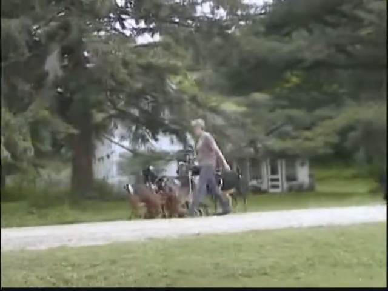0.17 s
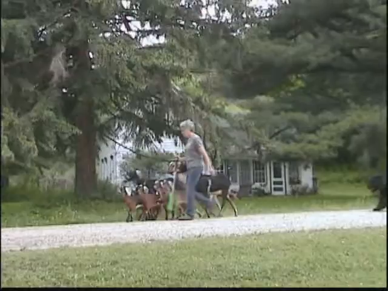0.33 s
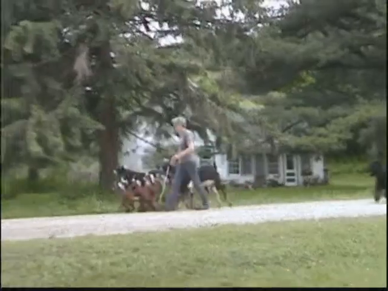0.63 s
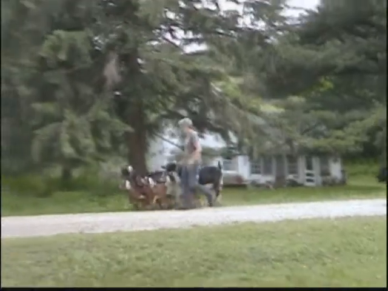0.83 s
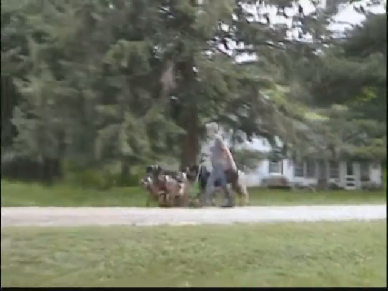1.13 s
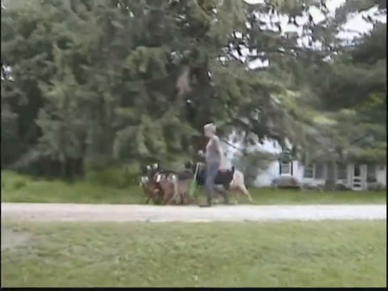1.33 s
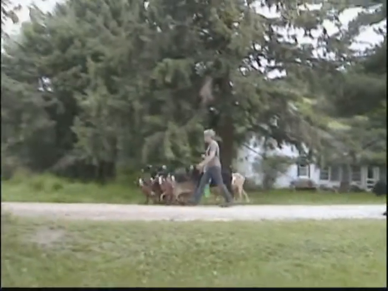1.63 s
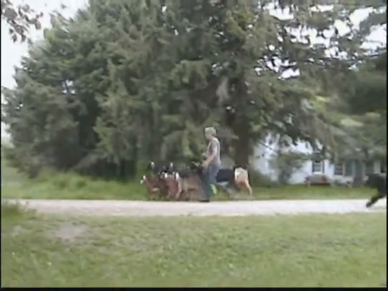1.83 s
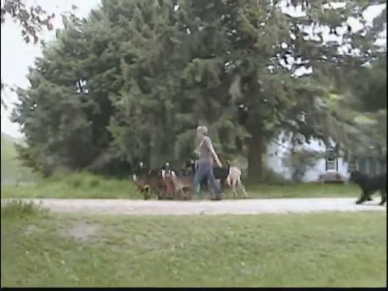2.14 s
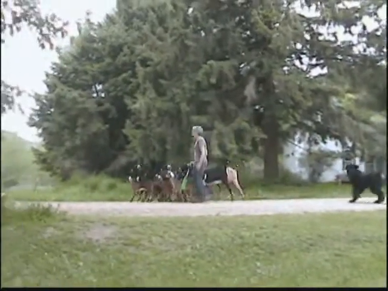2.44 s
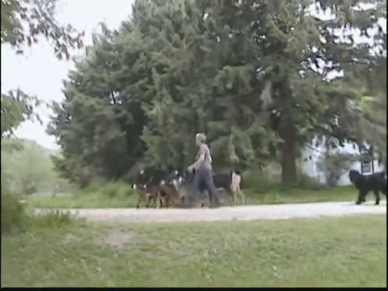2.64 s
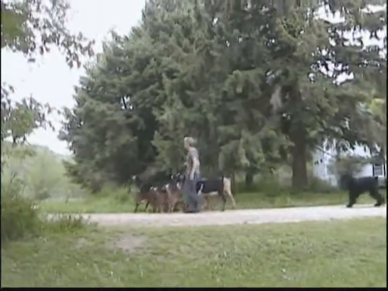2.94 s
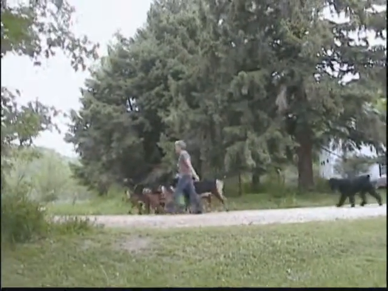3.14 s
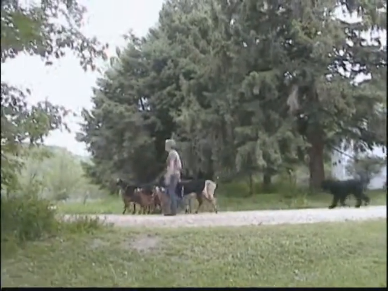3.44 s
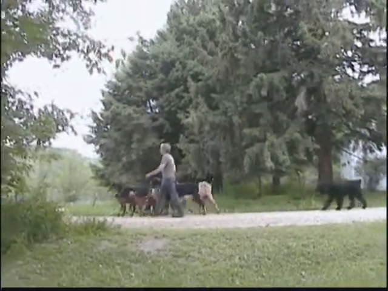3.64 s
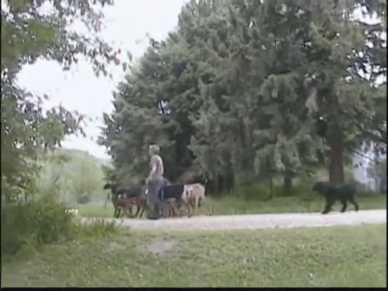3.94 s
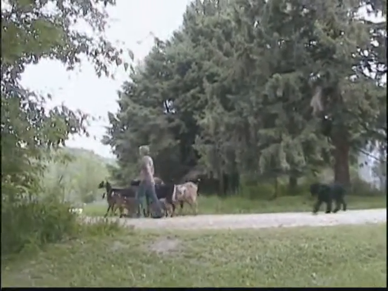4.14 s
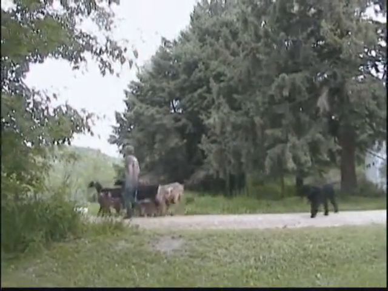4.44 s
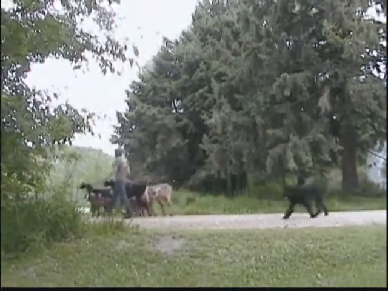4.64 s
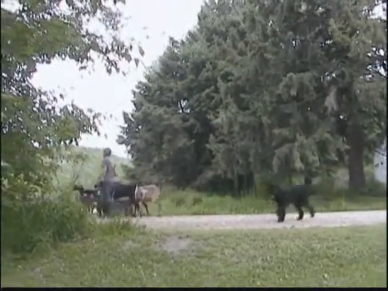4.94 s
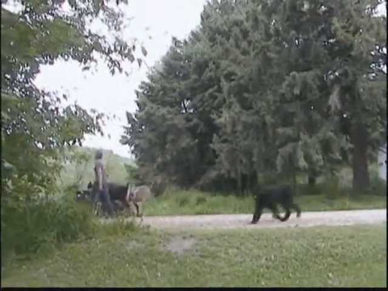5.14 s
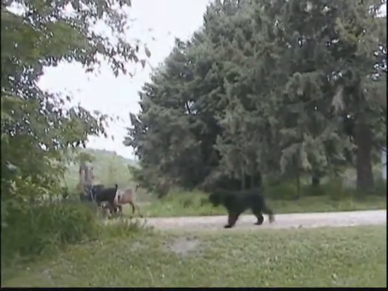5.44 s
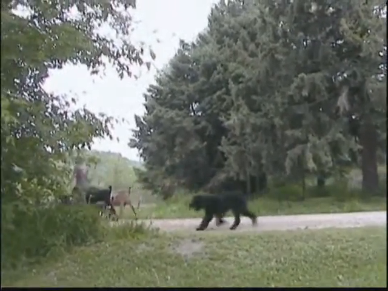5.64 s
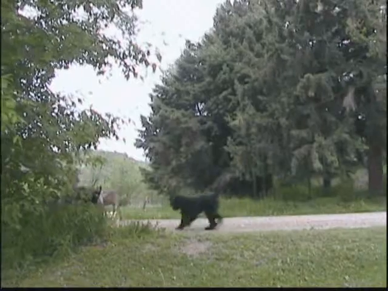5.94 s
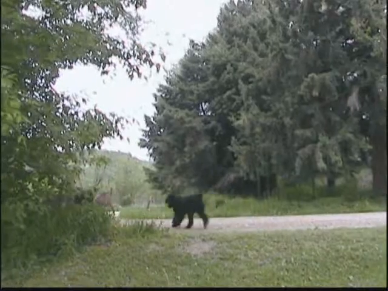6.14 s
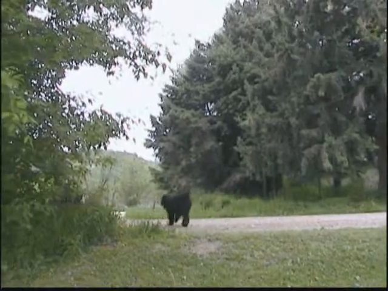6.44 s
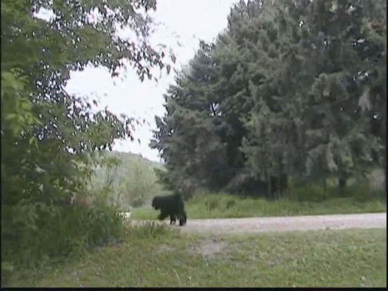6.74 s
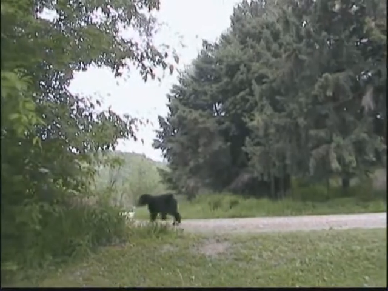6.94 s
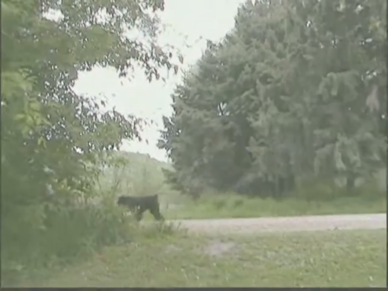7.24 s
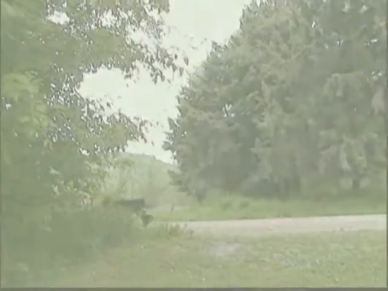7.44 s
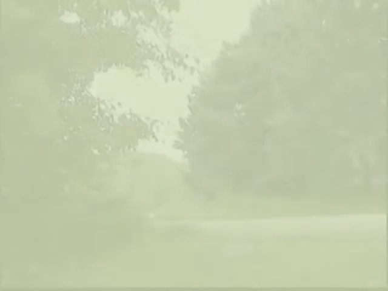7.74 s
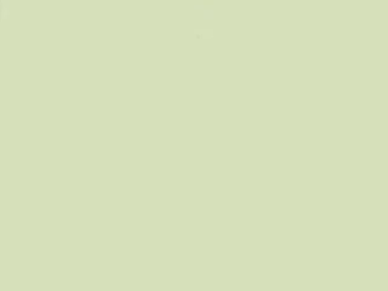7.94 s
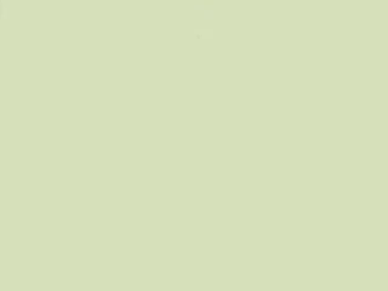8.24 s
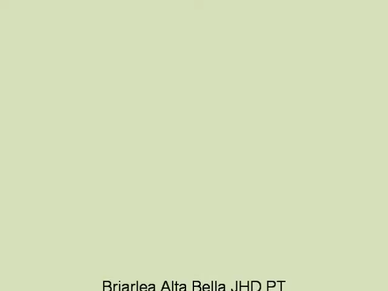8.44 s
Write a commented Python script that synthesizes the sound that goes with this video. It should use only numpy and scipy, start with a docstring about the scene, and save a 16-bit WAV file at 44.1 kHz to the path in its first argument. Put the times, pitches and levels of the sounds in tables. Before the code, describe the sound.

Outdoors, a herd of goats walks off with collar bells ticking and ringing at each step, hooves barely crunching on gravel. Scattered woody knocks and crisp grass rustles come from near the microphone. In the second half a small bird chirps softly in the trees while the jingling gradually weakens. A last sharp knock sounds just before the bells and quiet background hiss fade quickly.

```python
"""Jingle bells shake on the collars of a small herd of goats walking a gravel drive, some way off.
Each step throws the pellets against the slit shells, which tick and ring; hooves crunch faintly.
Close by someone scuffs through grass, a few dry knocks sound, and a songbird whistles in the trees.
Underneath lie a low outdoor murmur, soft hiss and the faint whine of a camera motor; all fades at the end."""
import sys
import numpy as np
from scipy import signal
from scipy.fft import rfft, irfft, next_fast_len
from scipy.io import wavfile
from scipy.ndimage import uniform_filter1d

SR = 44100
rng = np.random.default_rng(int(sys.argv[2]) if len(sys.argv) > 2 else 0)


def dump_mix(stems):
    """Bounce the given channels to the path in sys.argv[1] as a 16-bit WAV at rate SR."""
    frames = np.atleast_2d(stems).T  # one column per channel
    limited = np.clip(frames, -1, 1)  # hard clip at full scale
    pcm = np.round(limited * 32767).astype(np.int16)
    wavfile.write(sys.argv[1], SR, pcm)


N = 378800
TIME = np.arange(N) / SR
PADDED = next_fast_len(N, real=True)
FREQ = np.fft.rfftfreq(PADDED, 1 / SR)


def gain_of(db):
    """Decibels to amplitude."""
    return 10 ** (np.asarray(db) / 20)


def unit_rms(x):
    """Scales to an rms of one."""
    return x / np.sqrt(np.mean(x ** 2) + 1e-20)


def automation(rows):
    """Breakpoints in time, read at every sample."""
    return np.interp(TIME, *np.transpose(rows))


def eq_curve(points):
    """EQ points read at every frequency, on a log axis."""
    hz, db = np.transpose(points)
    return np.interp(np.log(FREQ + 1), np.log(hz + 1), db)


def filtered(x, response):
    """Filters x with a response given at every frequency."""
    return irfft(rfft(x, PADDED) * response, PADDED)[..., :N]


def equalised(x, points):
    """Runs x through an EQ."""
    return filtered(x, gain_of(eq_curve(points)))


def noise_bed(points):
    """Equalised noise with an rms of one."""
    return unit_rms(equalised(rng.standard_normal(N), points))


def band_rms(x, low_hz, high_hz):
    """Rms of x within a band."""
    band = rfft(x, PADDED)[(FREQ > low_hz) & (FREQ < high_hz)]
    return np.sqrt(2 * np.sum(abs(band) ** 2) / (N * PADDED))


def wander(rate_hz):
    """A random LFO with an rms of one."""
    knots = rng.standard_normal(4000)
    return unit_rms(np.interp(TIME * 2 * rate_hz, np.arange(len(knots)), knots))


def add(mix, start_s, sound):
    """Mixes a sound in at its cue."""
    part = mix[max(round(start_s * SR), 0):][:len(sound)]
    part += sound[:len(part)]


def attack(t, rise_s):
    """An exponential fade-in."""
    return 1 - np.exp(-t / rise_s)


def envelope(length, rise_s, fall_s):
    """Attack, hold and release of one event."""
    t = np.arange(0, length + 10 * fall_s, 1 / SR)
    return attack(t, rise_s) * np.exp(-np.maximum(t - length, 0) / fall_s)


def ring(t, hz, t60):
    """One mode, dying by 60 dB in t60 seconds."""
    return np.sin(2 * np.pi * hz * t) * np.exp(-np.log(1000) * t / t60)


# swells of dull rumble: (start [s], length [s], level [dB])
RUMBLE_SWELLS = [(0, 2.39, -65), (1.414, 0.22, -73), (5.947, 0.86, -68.5)]
# tone of the rumble: (frequency [Hz], gain [dB])
RUMBLE_EQ = [(60, -20), (110, -2), (150, 6), (210, -7), (280, 1), (450, -7), (620, -8.5), (1500, -29)]


def rumble(thump_db=-51.5, thump_s=0.028):
    """Low noise opens with a brief thump, then swells slowly."""
    level = gain_of(thump_db) * np.exp(-TIME / thump_s)
    for start, length, db in RUMBLE_SWELLS:
        add(level, start, gain_of(db) * envelope(length, rise_s=0.058, fall_s=0.11))
    return level * noise_bed(RUMBLE_EQ)


# tone of the outdoor murmur and of the hiss: (frequency [Hz], gain [dB])
MURMUR_EQ = [(25, -9.5), (60, 1), (100, 1.5), (145, 5), (215, -3), (275, 2.5), (340, -5.5), (450, -2),
             (570, -10), (800, -7.5), (1100, -10), (1800, -19), (3000, -25.5)]
HISS_EQ = [(500, -8), (1500, 3), (4500, 2), (6000, -2.5), (8000, -3), (11000, -15), (13000, -23.5)]


def open_air(murmur_db=-66.5, hiss_db=-68, gust_db=1.35):
    """Murmur and rumble waver in light gusts under a steady hiss."""
    lows = gain_of(murmur_db) * noise_bed(MURMUR_EQ) + rumble()
    hiss = gain_of(hiss_db) * noise_bed(HISS_EQ)
    return lows * gain_of(gust_db * wander(5.9)) + hiss


# partials of the camera motor: (frequency [Hz], relative level [dB])
MOTOR_PARTIALS = [(794, -82), (1498, -81), (1798, -84), (4195, -82.5), (4495, -80.5), (5394, -83),
                  (5695, -83), (5993, -80)]


def motor_whine(trim_db=-2, drift=0.00045):
    """Thin tones drift together with the motor's speed."""
    phase_per_hz = 2 * np.pi * np.cumsum(1 + drift * wander(6)) / SR
    return np.sqrt(2) * sum(gain_of(db + trim_db) * np.sin(hz * phase_per_hz) for hz, db in MOTOR_PARTIALS)


def ambience(width=0.28):
    """The stereo bed: motor and air in the centre, a second layer of air for width."""
    centre = motor_whine() + open_air()
    return centre + width * np.array([[1], [-1]]) * open_air()


def tree_echoes(x, wet_db, t60, per_s=2000):
    """The trees scatter sound back as a thin reverb tail."""
    t = TIME[:SR // 2]
    reflections = rng.standard_normal(len(t)) * (rng.random(len(t)) < per_s / SR)
    tail = reflections * gain_of(-60 * t / t60) * (t > 0.004)
    return gain_of(wet_db) * signal.oaconvolve(x, tail / np.linalg.norm(tail))[:N]


# the bird's slurs, by note name: (length [s], first pitch [Hz], last pitch [Hz])
BIRD_SLURS = {"sweep": (.07, 3350, 7000), "fall": (.095, 5800, 3450), "chip": (.042, 4100, 5100),
              "low rise": (0.061, 2790, 3065), "low fall": (0.15, 2600, 2200)}
# loose calls around the song: (time [s], note name, relative level [dB])
BIRD_CALLS = [(1.678, "fall", -67), (4.895, "fall", -59), (5.197, "chip", -53.5), (5.319, "fall", -59),
              (5.585, "chip", -63), (5.645, "chip", -56.5), (5.778, "fall", -55.5),
              (6.075, "low rise", -47), (6.31, "low fall", -57.5)]


def songbird(song_start_s=3.386, step_s=0.1824, count=6, arch_db=3.5, flutter_db=4, trim_db=-7.5):
    """A nearly pure, gliding whistle: a run of even sweeps, loudest midway, among looser calls."""
    out = np.zeros(N)
    song = [(song_start_s + k * step_s, "sweep", -54.5 + arch_db * np.sin(np.pi * k / (count - 1)))
            for k in range(count)]
    for start, note, db in song + BIRD_CALLS:
        length, first_hz, last_hz = BIRD_SLURS[note]
        hz = np.linspace(first_hz, last_hz, int(length * SR))
        whistle = np.sin(2 * np.pi * np.cumsum(hz) / SR) * signal.windows.tukey(len(hz), 0.7)
        add(out, start, gain_of(db + trim_db) * whistle)
    return out * gain_of(flutter_db * wander(60))


# dry knocks: (time [s], relative level [dB], brightness [dB])
KNOCK_HITS = [(0.263, -44, -4), (0.375, -38.5, -6.5), (0.424, -38, -11), (0.501, -45, -13.5),
              (1.118, -38, -18), (2.128, -42.5, -13.5), (2.162, -36.5, -1), (2.176, -40.5, -9.5),
              (2.215, -39, -8.5), (2.232, -44, -6.5), (3.544, -50.5, -11), (4.959, -46, -2.5),
              (5.106, -39.5, 6), (5.133, -45, 5.5), (7.644, -35, 7.5)]
# their woody body: (frequency [Hz], gain [dB], t60 [s])
WOOD_MODES = [(475, -14, 0.011), (718, 0, 0.053), (800, 4, 0.034), (870, 4.5, 0.019), (1076, -2, 0.036),
              (1363, -4, 0.056), (1660, 3, 0.017), (2410, -4.5, 0.013), (3930, -14.5, .007)]


def knocks(trim_db=3, neutral_brightness_db=-8, scatter=0.068, rebound_s=0.0045, rebound_db=-5.5):
    """Short dull blows that rebound once; a harder contact favours the higher modes."""
    out, t = np.zeros(N), TIME[:SR // 10]
    for start, db, brightness_db in KNOCK_HITS:
        db_per_octave = brightness_db - neutral_brightness_db
        for delay, touch_db in ((0, 0), (rebound_s, rebound_db)):
            tunings = 1 + scatter * rng.standard_normal(len(WOOD_MODES))
            blow = np.zeros(len(t))
            for (hz, mode_db, t60), tuning in zip(WOOD_MODES, tunings):
                gain = gain_of(mode_db + db_per_octave * np.log2(hz / 900))
                blow += gain * rng.choice([-1, 1]) * ring(t, hz * tuning, t60)
            add(out, start + delay, gain_of(db + trim_db + touch_db) * blow / abs(blow).max())
    return out


# feet pressing into grass close by: (start [s], length [s], relative level [dB])
GRASS_STEPS = [(1.113, 0.14, -43), (2.72, 0.03, -54), (2.987, 0.11, -53), (3.16, 0.1, -48),
               (3.658, 0.12, -58), (4.13, 0.088, -52), (4.288, 0.024, -55), (4.921, 0.015, -58),
               (5.016, .025, -63.5), (5.113, 0.072, -58), (5.982, 0.016, -59.5), (6.704, 0.29, -60.5),
               (6.944, 0.18, -57), (7.646, 0.027, -72)]


def tread_envelope(rise_s=0.0096, sag_db_per_s=29, spring_back_db=-15.5):
    """Each step lands, eases as the weight settles and lifts; the trodden grass springs back."""
    power = np.zeros(N)
    for start, length, db in GRASS_STEPS:
        press = envelope(length, rise_s, fall_s=0.035)
        press *= gain_of(db - sag_db_per_s * TIME[:len(press)])
        spring_back = gain_of(db + spring_back_db) * envelope(length, rise_s, fall_s=0.22)
        add(power, start, press ** 2)
        add(power, start, spring_back ** 2)
    return np.sqrt(power)


# tone of crushed grass: (frequency [Hz], gain [dB])
GRASS_EQ = [(200, -14.5), (700, -7.5), (1500, -10), (2800, -0.5), (4300, 1), (6000, 2.5), (8000, 3),
            (10000, 0.5), (13000, -12.5)]


def grass_scuffs(cracks_per_s=3500, spread_db=3, clump_db=2.5, tuft_db=1.6, trim_db=-4):
    """Clumps of tiny cracks and a noisy swish as grass is pressed and brushed."""
    cracks = (rng.random(N) < cracks_per_s / SR) * rng.standard_normal(N)
    cracks *= gain_of(spread_db * np.minimum(rng.exponential(1, N), 4))
    swish = 2.6 * rng.standard_normal(N)
    clumps = gain_of(clump_db * wander(70) + tuft_db * wander(14))
    rustle = equalised((unit_rms(cracks) + swish) * clumps, GRASS_EQ)
    return rustle / band_rms(rustle, 8400, 11600) * tread_envelope() * gain_of(trim_db)


# the loudest stalks breaking: (time [s], relative level [dB])
STALK_SNAPS = [(1.1304, -29.5), (1.1435, -20.5), (1.1643, -18.5), (1.2588, -28.5), (3.0168, -30),
               (3.0595, -33), (3.175, -29.5), (4.2031, -29), (6.7124, -28.5)]


def stalk_snaps(trim_db=-10, decay_s=0.0014):
    """Stalks snap underfoot in short, crisp bursts of noise."""
    out, t = np.zeros(N), TIME[:SR // 20]
    for start, db in STALK_SNAPS:
        add(out, start, gain_of(db + trim_db) * rng.standard_normal(len(t)) * np.exp(-t / decay_s))
    return equalised(out, GRASS_EQ)


# tone of distant gravel: (frequency [Hz], gain [dB])
GRAVEL_EQ = [(200, -13.5), (800, 4), (1600, 0), (3000, -10), (8000, -29.5)]


def hooves(per_s=30, level_db=-76, spread_db=3, decay_s=0.0049):
    """Many faint footfalls, each a brief crunch of gravel."""
    t = TIME[:SR // 20]
    steps = (rng.random(N) < per_s / SR) * gain_of(spread_db * np.minimum(rng.exponential(1, N), 3))
    crunch = signal.oaconvolve(steps, np.exp(-t / decay_s))[:N] * rng.standard_normal(N)
    return gain_of(level_db) * unit_rms(equalised(crunch, GRAVEL_EQ))


# pings of the one higher bell: (time [s], level [dB])
HIGH_BELL_HITS = [(.27, -56), (.78, -51.5), (.97, -48), (2.312, -48.5), (2.513, -55), (2.63, -54),
                  (2.93, -67), (3.56, -56.5)]


def high_bell(hz=3435, t60=0.38, detune=0.0034):
    """A bell of a different make rings higher and longer, in a single clear mode."""
    out, t = np.zeros(N), TIME[:SR // 2]
    for start, db in HIGH_BELL_HITS:
        ping = ring(t, hz * (1 + detune * rng.standard_normal()), t60)
        add(out, start, gain_of(db) * ping * attack(t, 0.0061))
    return out


# upper modes of a bell's shell: (frequency [Hz], gain [dB], t60 [s])
SHIMMER_MODES = [(3464, -9, .2), (6650, -7, 0.22), (6740, -4, 0.043), (7712, -2, 0.15), (7800, -3.5, 0.091),
                 (12040, -14.5, .1), (12470, -4, 0.12), (12620, -9.5, 0.07), (13442, -23, 0.09)]


def shimmer(t, spread_db, detune=0.0025):
    """Where the pellet lands decides how much each upper mode gets."""
    luck = rng.standard_normal((len(SHIMMER_MODES), 2))
    return sum(gain_of(db + spread_db * louder) * ring(t, hz * (1 + detune * sharper), t60)
               for (hz, db, t60), (louder, sharper) in zip(SHIMMER_MODES, luck))


def pellet_tick(t, decay_s):
    """The bright transient of pellet meeting shell."""
    return np.diff(rng.standard_normal(len(t) + 1)) * np.exp(-t / decay_s)


# the herd's light tinkle between shakes: (time [s], relative level [dB])
TINKLE_FLOOR = [(0, -48.5), (1.1, -48.5), (1.4, -58), (2.8, -54), (3.3, -53.5), (4.05, -62), (5.3, -55.5),
                (5.7, -73), (6.1, -57.5), (7.9, -57)]
# a goat's step shakes its bell: (start [s], length [s], relative level [dB])
BELL_SHAKES = [(0.035, 0.059, -36.5), (0.327, 0.08, -36), (0.626, 0.037, -32), (0.85, 0.038, -36),
               (0.959, .13, -37.5), (1.171, 0.11, -40), (1.461, 0.058, -42), (1.612, 0.007, -39),
               (1.753, 0.088, -45.5), (2.007, .08, -39.5), (2.29, 0.095, -35), (2.542, 0.047, -41.5),
               (2.644, 0.029, -40), (2.743, 0.037, -45), (2.863, .16, -40.5), (3.13, 0.11, -46.5),
               (3.453, 0.2, -46.5), (3.659, 0.22, -48), (3.902, 0.097, -43.5), (4.101, 0.2, -40),
               (4.376, 0.224, -41), (4.634, 0.077, -42), (4.793, .08, -46.5), (4.925, 0.095, -46.5),
               (5.145, 0.11, -40.5), (5.277, 0.056, -48.5), (5.952, 0.044, -52), (6.453, 0.053, -42.5),
               (6.628, .19, -45), (7.0, 0.3, -49.5), (7.394, 0.16, -49.5), (7.6, .1, -44)]


def shake_envelope(trim_db=-1.5):
    """Each step sets the bells rattling at once; they settle quickly to a light tinkle."""
    power = gain_of(automation(TINKLE_FLOOR)) ** 2
    for start, length, db in BELL_SHAKES:
        shake = gain_of(db + trim_db) * envelope(length, rise_s=0.0058, fall_s=0.021)
        add(power, start, shake ** 2)
    return np.sqrt(power)


# the collar bells: (pitch [Hz])
BELL_PITCHES = [2668, 2738, 2765]


def bell_rattle(hits_per_s=52, t60=0.13, detune=0.015, spread_db=3, spot_count=36, trim_db=-4.5):
    """Pellets roll and bounce in each bell; the pitch shifts a little with the spot that they hit."""
    out, t = np.zeros(N), TIME[:SR // 8]
    for hz in BELL_PITCHES:
        spots = []
        for _ in range(spot_count):
            body = ring(t, hz * (1 + detune * rng.standard_normal()), t60) * attack(t, 0.00027)
            top = gain_of(-22) * shimmer(t, spread_db=6) + gain_of(-33) * pellet_tick(t, 0.0023)
            spots.append(body + top)
        strength = gain_of(spread_db * rng.standard_normal(N))
        for at in np.flatnonzero(rng.random(N) < hits_per_s / SR):
            add(out, at / SR, strength[at] * spots[at % spot_count])
    # level the rattle so that the shakes set its dynamics
    running_rms = np.sqrt(abs(uniform_filter1d(out ** 2, size=1500)) + 0.0014)
    return out / running_rms * shake_envelope() * gain_of(trim_db)


# close modes from the halves of the slit shell: (pitch ratio, gain [dB])
SHELL_MODES = [(1.0, 4.5), (.972, -11), (1.022, -11.5)]
# the hardest pellet hits: (time [s], relative body level [dB], pitch [Hz], relative top level [dB])
BELL_HITS = [(0.046, -32, 2643, -50), (0.102, -34, 2700, -55), (0.329, -23.5, 2780, -41),
             (0.412, -33.5, 2710, -55), (0.632, -33, 2766, -42), (0.855, -31.5, 2790, -44),
             (0.978, -22, 2770, -40.5), (1.029, -19.5, 2777, -44), (1.459, -35, 2666, -57),
             (1.612, -35, 2757, -53), (1.765, -30, 2722, -74), (1.972, -35.5, 2770, -69),
             (2.009, -29, 2750, -50), (2.051, -28, 2773, -58.5), (2.297, -27.5, 2750, -54.5),
             (2.317, -23, 2750, -40), (2.654, -32, 2730, -53), (2.67, -21.5, 2742, -44),
             (2.727, -33.5, 2750, -52), (2.866, -31, 2690, -48.5), (2.939, -31.5, 2744, -40.5),
             (2.986, -28.5, 2746, -55), (3.477, -29.5, 2660, -54), (3.556, -25, 2758, -46),
             (3.626, -30, 2740, -50), (3.79, -32, 2656, -55), (3.964, -33, 2700, -50),
             (4.253, -30, 2730, -51), (4.422, -26.5, 2715, -76), (4.535, -24, 2752, -48),
             (4.673, -33, 2570, -51.5), (4.821, -32, 2760, -47.5), (4.979, -30.5, 2663, -70),
             (5.166, -30, 2784, -41.5), (5.921, -27.5, 2704, -55), (6.185, -35, 2673, -61),
             (6.455, -32, 2733, -64), (6.629, -31.5, 2816, -51), (6.766, -37.5, 2723, -61),
             (7.406, -29, 2730, -54)]


def bell_strikes(t60=0.076, body_trim_db=-4, top_trim_db=-6):
    """A pellet hits the shell hard: a bright tick, then the ring swells and dies."""
    out, t = np.zeros(N), TIME[:SR // 6]
    for start, body_db, hz, top_db in BELL_HITS:
        body = sum(gain_of(db) * ring(t, hz * ratio, t60) for ratio, db in SHELL_MODES)
        top = shimmer(t, spread_db=4) + gain_of(-10) * pellet_tick(t, 0.0054)
        add(out, start, gain_of(body_db + body_trim_db) * body * attack(t, 0.0044))
        add(out, start, gain_of(top_db + top_trim_db) * top * attack(t, 0.0004))
    return out


def receding(bells, shelf_hz=10190, start_db=5, loss_db_per_s=1.2):
    """A falling high shelf: the bells' sparkle dulls as the goats walk away."""
    sparkle = filtered(bells, 1 / (1 + (shelf_hz / (FREQ + 1)) ** 12))
    return bells + sparkle * (gain_of(start_db - loss_db_per_s * TIME) - 1)


# stereo width: (frequency [Hz], side minus mid [dB])
WIDTH_EQ = [(100, -20), (1000, -14.5), (2700, -26.5), (5000, -12.5), (12000, -7)]
# stereo balance: (frequency [Hz], left minus right [dB])
PAN_EQ = [(100, 2.5), (500, -2.5), (1500, -0.5), (2750, 0.45), (5000, 2.5), (8000, 1.6), (12000, -1.5)]


def scene():
    """All sources reach a close pair of microphones; echoes and near rustle differ between the two."""
    bells = receding(bell_strikes() + high_bell() + bell_rattle())
    far = bells + knocks() + hooves()
    bird = songbird()
    echoes = np.array([tree_echoes(far, wet_db=-20.5, t60=0.24) + tree_echoes(bird, wet_db=-6, t60=0.51)
                       for _ in range(2)])
    mid = far + bird + grass_scuffs() + stalk_snaps()
    # a quarter-cycle shift: off-centre sound reaches one microphone slightly before the other
    side = filtered(mid, -1j * gain_of(eq_curve(WIDTH_EQ))) + gain_of(-17.5) * grass_scuffs()
    pan = gain_of(eq_curve(PAN_EQ) / 2)
    direct = np.array([filtered(mid + side, pan), filtered(mid - side, 1 / pan)])
    return direct + echoes + ambience()


# the camera's dead bands: (centre [Hz], half width [Hz], depth [dB])
DEAD_BANDS = [(2035, 54, 20), (3676, 102, 30.5)]
# master fader, held up until the fade-out: (time [s], gain [dB])
MASTER_FADER = [(7.92, 6.5), (7.95, -23.5), (8.0, -75)]


def record(dry, cutoff_hz=13650):
    """The master chain: two narrow notches, the fader and a steep low-pass."""
    dip_db = sum(depth * np.exp(-((FREQ - hz) / width) ** 4) for hz, width, depth in DEAD_BANDS)
    faded = filtered(dry, gain_of(-dip_db)) * gain_of(automation(MASTER_FADER))
    low_pass = signal.firwin(301, cutoff_hz, window=("kaiser", 9), fs=SR)
    return signal.oaconvolve(faded, low_pass[None], "same")


dry = scene()
out = record(dry)
dump_mix(out)
```